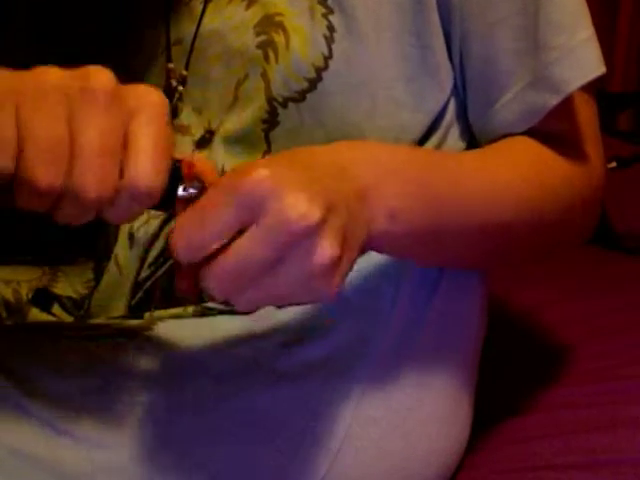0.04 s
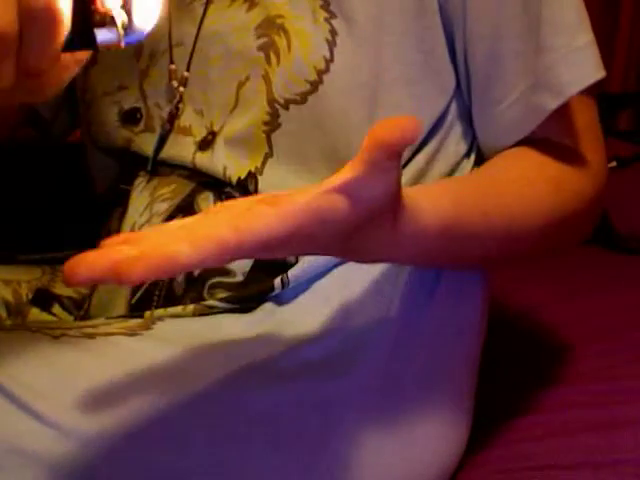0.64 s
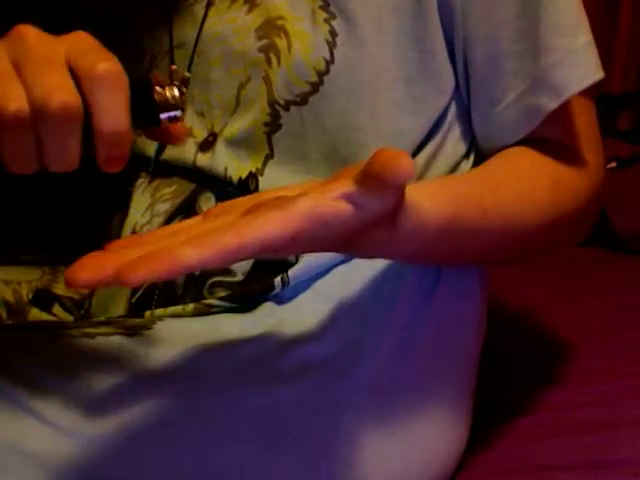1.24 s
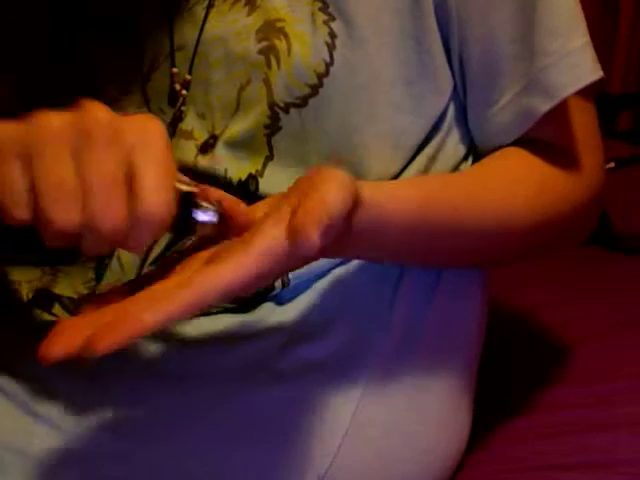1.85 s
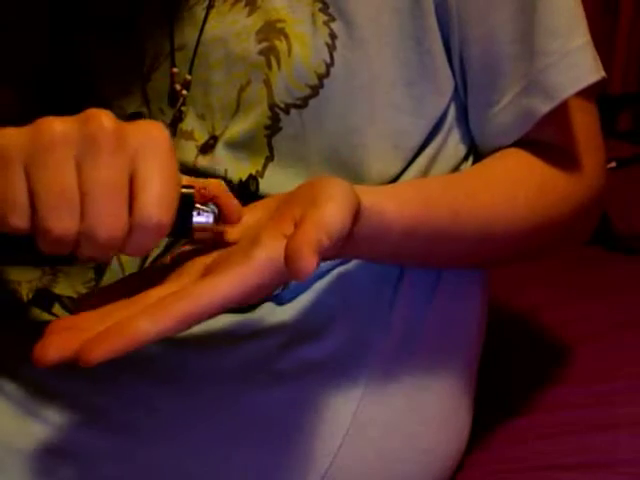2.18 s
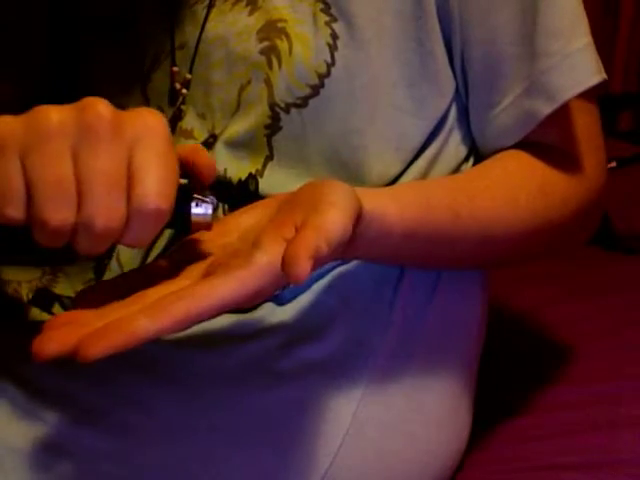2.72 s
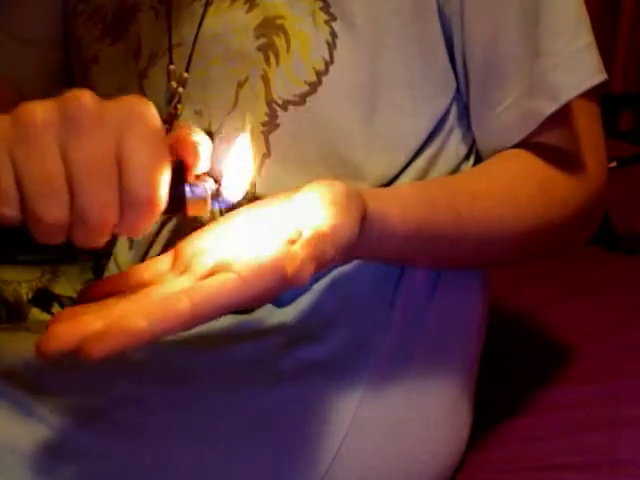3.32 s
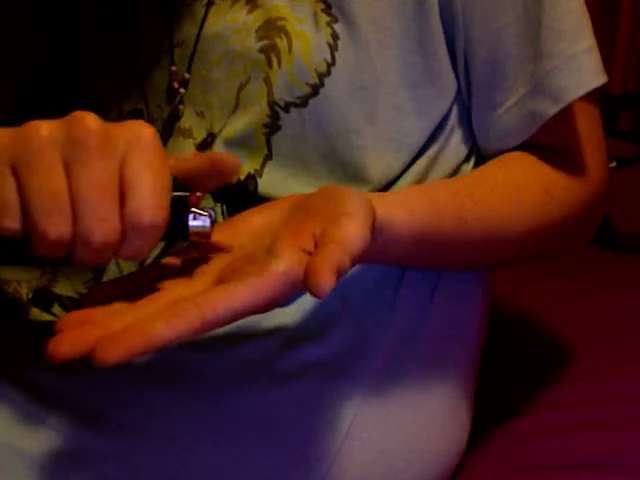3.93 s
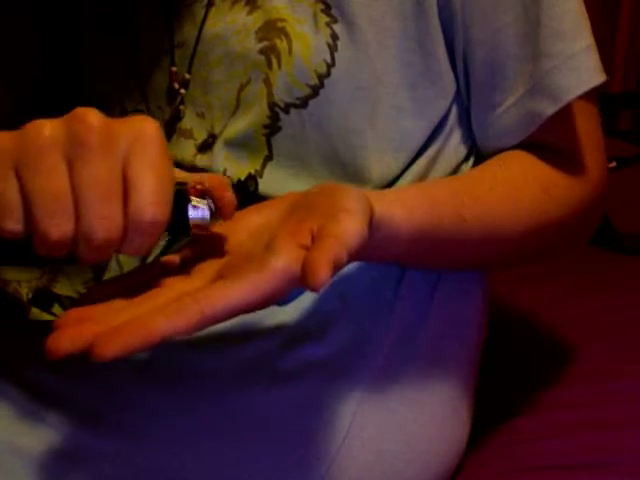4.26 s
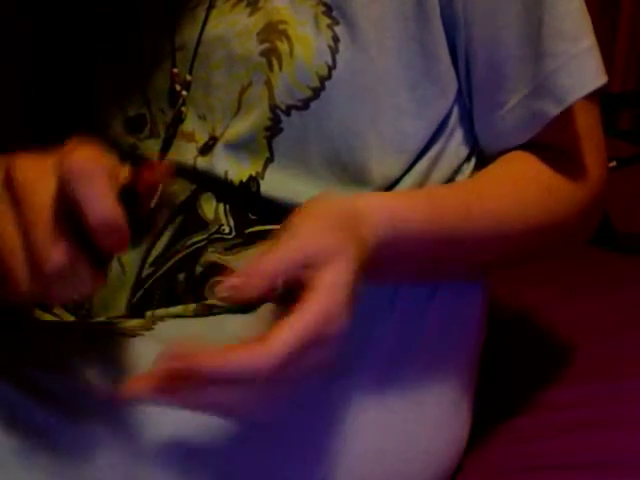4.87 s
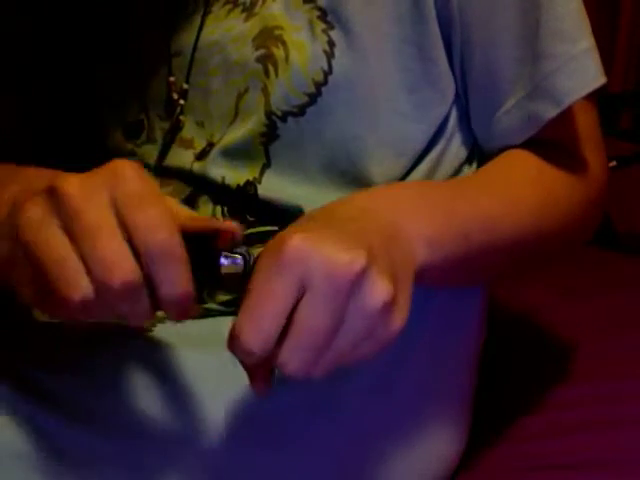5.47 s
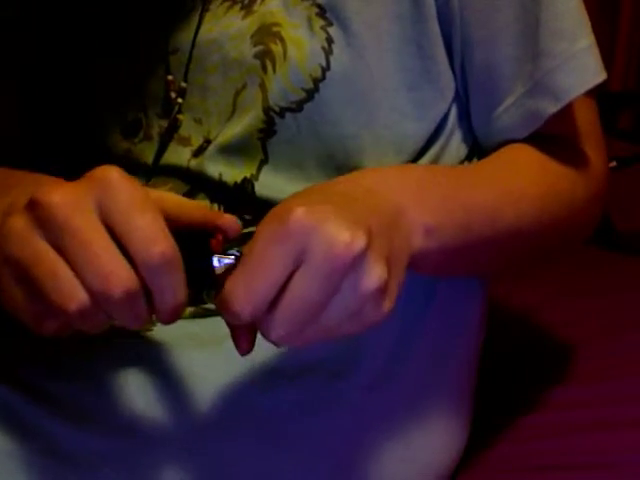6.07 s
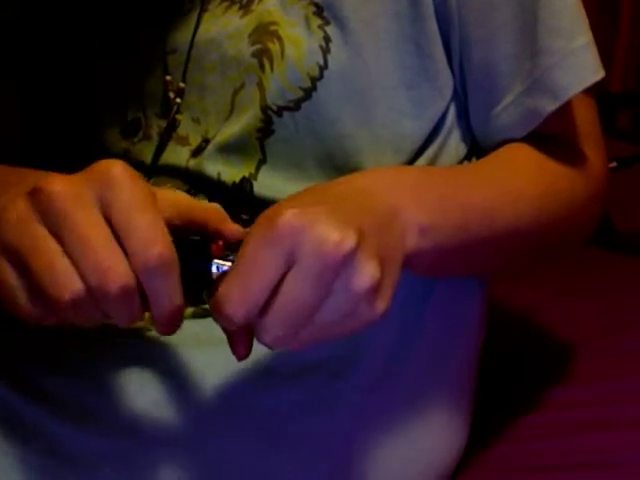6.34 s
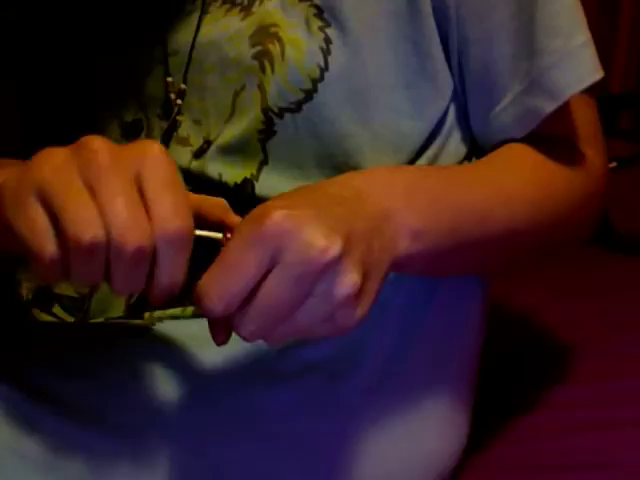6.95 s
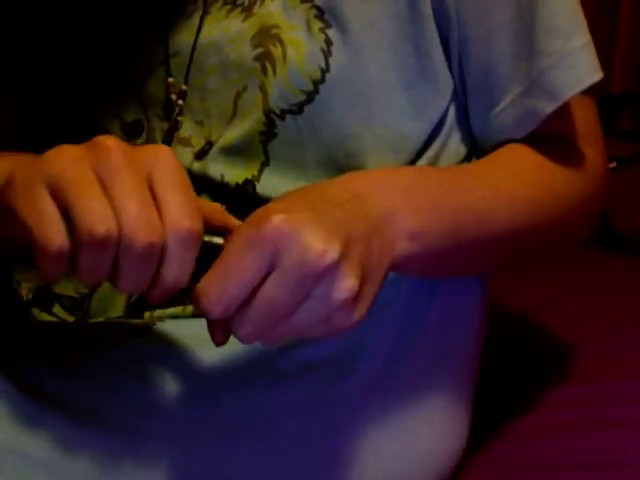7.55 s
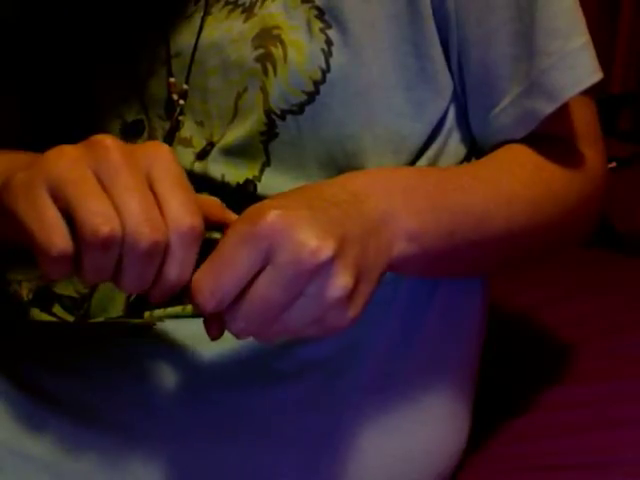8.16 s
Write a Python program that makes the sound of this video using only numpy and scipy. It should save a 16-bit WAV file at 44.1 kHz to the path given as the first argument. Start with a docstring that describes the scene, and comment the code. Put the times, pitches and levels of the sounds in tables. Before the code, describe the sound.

A flint lighter is handled close to the microphone in a quiet, furnished room. At about 0.1 seconds the wheel rasps and clicks with a tiny metallic ring, and the gas catches with a soft thump. A faint hiss and flame flutter follow, ending with small clicks near 0.8 seconds. At 2.5 seconds a light click releases a brief gas hiss, which stops with more clicks at 2.8. A louder strike comes at 3.1 seconds, with another soft thump and hiss, and the lever snaps shut sharply at 3.5. After a lull, a click at 6.8 seconds starts a steady, hollow, slightly whistling hiss of unlit gas flowing into a closed fist, lasting to the end at about 8 seconds. Throughout, a low computer fan drone and mains hum sit beneath a faint, high, rapidly pulsing electronic whine.

```python
"""A flint lighter is struck twice over a palm, then held unlit in a closed fist that fills with gas.
Friction makes the wheel rasp, impacts of thumb and lever click and set the steel ringing, and the gas
catches with a soft thump. The turbulent jet hisses, at the end through the resonances of the fist.
Underneath, a computer fan beats against mains hum and a camera's electronics whine at their frame rate."""
import sys
import numpy as np
from scipy import signal
from scipy.fft import rfft, irfft, next_fast_len
from scipy.io import wavfile
from scipy.ndimage import uniform_filter1d

SR = 44100
rng = np.random.default_rng(int(sys.argv[2]) if len(sys.argv) > 2 else 0)


def dump(signal):
    """Clip the signal to [-1, 1] and save it as 16-bit WAV at the path in sys.argv[1]."""
    limited = np.clip(np.atleast_2d(signal).T, -1, 1)
    pcm = np.round(limited * 32767).astype(np.int16)
    wavfile.write(sys.argv[1], SR, pcm)


N = 361619
T = np.arange(N) / SR
FILL_START_S = 6.765  # gas begins to flow into the fist

# spectrum of the gas jet: frequency_hz, gain_db
JET_SPECTRUM = [(900, -22), (1700, 6), (2250, 15), (2900, 0), (4200, -1.5), (6000, 4), (9500, -3.5),
                (12500, -5), (14000, 0.5), (16000, -33)]
# cavity modes of the fist: centre_hz, nominal_width_hz, relative_level_db
FIST_MODES = [(2226, 216, 3), (3810, 300, -9), (6150, 640, -12.5), (7850, 460, -12), (11900, 1600, -20)]


def amp(db):
    """Decibels as an amplitude ratio."""
    return 10 ** (np.asarray(db) / 20)


def unit(x):
    """A signal scaled to rms 1."""
    return x / np.sqrt(np.mean(x ** 2) + 1e-20)


def gain_at(spectrum, hz):
    """A spectrum's gain, interpolated on a log-frequency axis."""
    f, db = np.transpose(spectrum)
    return amp(np.interp(np.log(hz + 1), np.log(f), db))


def bell(hz, centre_hz, width_hz):
    """Lorentzian resonance curve: the gain halves at width_hz from the centre."""
    return 1 / (1 + ((hz - centre_hz) / width_hz) ** 2)


def noise(gain, size=N):
    """Noise of rms 1, coloured by a function of frequency."""
    padded = next_fast_len(size, True) * 2
    spectrum = rfft(rng.standard_normal(padded)) * gain(np.fft.rfftfreq(padded, 1 / SR))
    return unit(irfft(spectrum)[:size])


def add(mix, start_s, sound):
    """Superpose a sound on the mix."""
    part = mix[max(round(start_s * SR), 0):][:len(sound)]
    part += sound[:len(part)]


def burst(envelope, gain):
    """Coloured noise that carries the energy of its envelope."""
    return unit(envelope * noise(gain, size=len(envelope))) * np.sqrt(np.mean(envelope ** 2))


def fan_and_mains(air_db=-42):
    """Beating: fan tone and mains hum, 10 Hz apart, interfere over steady air noise."""
    # fan and mains tones: pitch_hz
    pitches = [89.97, 100.09, 166.7, 233.4, 385.5, 499.9, 898.7, 1100]
    # the same tones: rms_level_db
    levels = [-33, -43.5, -54, -57.5, -61, -66.5, -63.5, -65]
    # room air and microphone hiss: frequency_hz, gain_db
    air_spectrum = [(20, -36), (30, -18), (45, -5), (90, 0), (180, -1.5), (350, -7), (700, -11),
                    (1500, -16.5), (3000, -18.5), (6000, -23), (11000, -24), (13500, -25.5), (16000, -18.5)]
    tones = sum(amp(db) * np.sqrt(2) * np.cos(2 * np.pi * hz * T) for hz, db in zip(pitches, levels))
    return tones + amp(air_db) * noise(lambda f: gain_at(air_spectrum, f))


def electronics(frame_hz=14.982, first_frame_s=.0056, duty=.49, idle_hz=12000, tick_decay_s=.0066):
    """Periodic gating: each frame readout brings a tick, whine and fizz; a thin tone fills the pauses."""
    # readout whine: pitch_hz, rms_level_db
    low_whine, high_whine = [(8000, -47.5), (15248, -47.5)]
    # weaker readout tones: pitch_hz, rms_level_db
    fizz_tones = [(4950, -65), (9470, -63.5), (9900, -64), (10630, -60.5), (11052, -56.5), (11488, -59),
                  (11806, -58.5), (12200, -64), (12947, -58)]
    progress = (T - first_frame_s) * frame_hz % 1 / duty  # passes 1 as the readout ends
    gate = uniform_filter1d(1. * (progress < 1), size=50)
    tone = lambda hz, db: amp(db) * np.sqrt(2) * np.sin(2 * np.pi * hz * T)
    late_fade = 1 - .91 * np.minimum(progress, 1) ** 4
    whine = tone(*low_whine) + tone(*high_whine) * late_fade
    fizz = amp(-57) * noise(lambda f: bell(f, 10500, 4200)) + sum(tone(*row) for row in fizz_tones)
    tick = amp(-50) * np.exp(-progress * duty / frame_hz / tick_decay_s) * rng.standard_normal(N)
    return gate * (whine + fizz) + tick + (1 - gate) * tone(idle_hz, db=-60)


def faint_tone(pitch_hz=2135, width_hz=65, level_db=-54.5, flutter_db=2):
    """Random amplitude modulation makes a narrow noise band a fuzzy, fluttering tone."""
    flutter = flutter_db * noise(lambda f: bell(f, 0, 35))
    return amp(level_db + flutter) * noise(lambda f: bell(f, pitch_hz, width_hz))


def microphone_hiss(level_db=-57):
    """Self-noise in narrow, steady treble bands."""
    # hiss bands: centre_hz, width_hz, gain_db
    bands = [(8980, 200, 3.5), (12200, 260, 4), (12900, 310, -4)]
    return amp(level_db) * noise(lambda f: sum(amp(db) * bell(f, hz, width) for hz, width, db in bands))


def wheel(teeth_hz=900, bite=.3, spark_db=-22, snap_db=6, snap_s=.0035, slip_s=.0052, coast_s=.06):
    """Stick-slip friction: the toothed wheel creeps on the flint, breaks free, surges and is braked."""
    # spins: start_s, breakaway_s, fastest_s, surge_level_db, starting_creep_db
    spins = [(0.075, .126, .1485, -12, -44), (3.063, 3.107, 3.1233, -11.5, -33.5)]
    # rasp of the flint: frequency_hz, gain_db
    flint_spectrum = [(40, -17), (150, -6), (500, -12), (1000, -11), (1800, -4.5), (4500, -1.5), (9000, -5),
                      (13000, 0.5), (16000, -16)]
    # wheel and hood resonances the thumb leaves free, a list per spin: centre_hz, height_db
    grips = [
        [(2420, -10), (5850, -1), (7100, -2), (10450, -2), (12000, -6)],
        [(4150, 4), (6750, 0), (12800, -6), (13500, 1)],
    ]
    creep_db_per_s, surge_db_per_s, brake_db_per_s = 176, 454, 1050
    out = np.zeros(N)
    for (start_s, free_s, fastest_s, surge_db, creep_db), grip in zip(spins, grips):
        t = np.arange(start_s, fastest_s + coast_s, 1 / SR)
        driven_s = np.minimum(t, fastest_s)
        creep = amp(creep_db + creep_db_per_s * (driven_s - start_s))
        snap = snap_db * np.exp(-((t - fastest_s) / snap_s) ** 2)  # sparks tear off at full speed
        surge = amp(surge_db - surge_db_per_s * (fastest_s - driven_s) + snap)
        slipping = .5 + .5 * np.tanh((t - free_s) / slip_s)
        level = np.hypot(creep, slipping * surge) * amp(-brake_db_per_s * (t - driven_s))
        speed = np.exp(.3 * noise(lambda f: bell(f, 0, 200), size=len(t)))
        teeth = np.cumsum(teeth_hz * speed) / SR
        tooth_force = rng.uniform(.4, 1.6, 4096)[teeth.astype(int) % 4096]
        rasp = level * unit(1 - bite + 3 * bite * tooth_force * np.exp(-(teeth % 1) / .37))
        bright_share = level ** 2 / (level ** 2 + amp(spark_db) ** 2)  # grows as sparks fly
        resonances = lambda f: 1 + sum(amp(db) * bell(f, hz, 280) for hz, db in grip)
        colour = lambda f: gain_at(flint_spectrum, f) * resonances(f)
        add(out, start_s, burst(rasp * np.sqrt(bright_share), colour))
        add(out, start_s, burst(rasp * np.sqrt(1 - bright_share), lambda f: colour(f) * bell(f, 4100, 5500)))
    return out


def clicks(rise_s=.00058, cupped_db=8):
    """Damped impacts: plastic and steel knock together, and the grip stills the case in milliseconds."""
    # lever and wheel impacts: time_s, level_db, decay_s, resonance_hz, height_db, tilt_db_per_octave
    impacts = [(.149, -13, 0.0025, 1700, 10, -0.5), (.156, -11.5, 0.003, 2300, 28, 2),
               (.2095, -28, 0.0025, 2370, 18, -1), (.235, -20.5, 0.0012, 2100, 16, 0.5),
               (.537, -36, .003, 3600, 6, -13), (.8227, -25, 0.0028, 1500, -5, -2),
               (.858, -26.5, .00084, 11100, 14, 4.5), (2.463, -20.5, .003, 5500, 3, -2.5),
               (2.472, -32, .002, 3000, -3, 5), (2.568, -35.5, .002, 4200, 4, -3),
               (2.794, -28, .00089, 4600, 2, 3), (2.8063, -19, 0.0016, 7900, 13, 0.5),
               (2.813, -25, .0021, 2450, 5, -2), (3.0643, -22, .0012, 4500, 7, -2),
               (3.123, -7, 0.0039, 3940, 17, 6), (3.129, -3, 0.0021, 13200, 13, 16),
               (3.1415, -12, 0.0042, 6500, 2, -1), (3.5278, -19.5, 0.00095, 4400, 8, -6),
               (3.5447, -4, 0.0016, 5100, 15, 2.5), (4.569, -35.5, .0022, 5430, 15, -3),
               (6.761, -16, 0.0016, 4250, 6, 1.5), (6.763, -24, 0.0058, 2300, 12, -5),
               (6.7705, -21.5, 0.0019, 2300, 21, -3), (6.861, -34, .0015, 6200, 5, -1)]
    # response of the case: frequency_hz, gain_db
    case_spectrum = [(150, -26), (800, -16), (1400, -5), (2100, 0.5), (4000, 1), (7000, -1.5), (9500, -3.5),
                     (12500, -1), (16000, -8.5)]
    out, t = np.zeros(N), np.arange(-.003, .04, 1 / SR)
    f = np.fft.rfftfreq(len(t), 1 / SR)
    for time_s, level_db, decay_s, hz, height_db, tilt_db in impacts:
        envelope = np.exp(-(np.minimum(t, 0) / rise_s) ** 2 - np.maximum(t, 0) / decay_s)
        tilt = amp(tilt_db * np.log2((f + 500) / 4000))
        colour = gain_at(case_spectrum, f) * tilt * (1 + amp(height_db) * bell(f, hz, 300))
        if time_s > FILL_START_S - .5:  # the closed fist colours the click
            colour *= 1 + amp(cupped_db) * sum(bell(f, mode, width / 2) for mode, width, _ in FIST_MODES)
        knock = irfft(rfft(envelope * rng.standard_normal(len(t))) * colour, len(t))
        add(out, time_s + t[0], amp(level_db) * unit(knock) * np.sqrt(np.mean(envelope ** 2)))
    return out


def steel_ring():
    """Free vibration of spring and hood; where a blow lands decides which mode leads."""
    # blows: time_s, level_db, tension_pitch_factor, lead_pitch_hz, lead_level_db, lead_t60_s
    blows = [(.15, -38.5, 1.13, 1300, -36, 0.29), (3.125, -36, 0.99, 4270, -28, 0.21),
             (3.5445, -30, 1, 2800, -32, 0.17)]
    # spring and hood modes: base_pitch_hz, relative_level_db, t60_s
    modes = [(1170, -8, 0.25), (1406, -6.5, 0.39), (2480, -2, 0.098), (4167, -2, 0.17), (4960, -10, .13),
             (6578, -13, .18), (6800, -6, .18)]
    out, t = np.zeros(N), np.arange(SR // 2) / SR
    mode = lambda hz, db, t60: amp(db - 60 * t / t60) * np.sin(2 * np.pi * hz * t)
    for time_s, level_db, tension, *lead in blows:
        ring = sum(mode(hz * tension, level_db + db, t60) for hz, db, t60 in modes)
        add(out, time_s, mode(*lead) + ring)
    return out


def gas_jets(low_hz=7800, high_hz=13900):
    """Turbulent nozzle flow hisses with two fuzzy whistles; the upper is stronger when the gas burns."""
    # releases into open air: start_s, end_s, level_db, low_whistle_height_db, high_whistle_height_db
    releases = [(0.159, 0.83, -47.5, 0, 10), (2.465, 2.804, -45, 9, -10), (3.124, 3.558, -46, 6, 3)]
    out = np.zeros(N)
    for start_s, end_s, level_db, low_db, high_db in releases:
        valve = signal.windows.tukey(round((end_s - start_s) * SR), .04)
        whistles = lambda f: 1 + amp(low_db) * bell(f, low_hz, 310) + amp(high_db) * bell(f, high_hz, 450)
        add(out, start_s, amp(level_db) * burst(valve, lambda f: gain_at(JET_SPECTRUM, f) * whistles(f)))
    return out


def ignitions(fall_per_s=11, overtone=.18, rush_db=-7.5):
    """Thermal expansion: the swelling flame pushes the air in a falling thump with a dull rush."""
    # the gas catches: time_s, level_db, half_length_s, glide_start_hz
    thumps = [(0.173, -20.5, 0.0058, 180.6), (3.1413, -14.5, 0.0084, 180.6)]
    out, t = np.zeros(N), np.arange(-.04, .06, 1 / SR)
    for time_s, level_db, half_length_s, hz in thumps:
        swell = amp(level_db) * np.exp(-(t / half_length_s) ** 2)
        angle = 2 * np.pi * (np.cumsum(hz * np.exp(-fall_per_s * t)) / SR + rng.random())
        rush = amp(rush_db) * burst(swell, lambda f: bell(f, 275, 130) * f / (f + 80))
        add(out, time_s + t[0], swell * (np.sin(angle) + overtone * np.sin(2 * angle)) + rush)
    return out


def puffs():
    """Flame flutter and the friction of skin on cloth give soft swells of low band noise."""
    # swells: time_s, level_db, half_length_s, centre_hz, width_hz
    swells = [(0.533, -45.5, .012, 1090, 300), (.647, -38.5, 0.012, 350, 120), (0.677, -49, 0.1, 400, 400),
              (0.774, -40.5, .021, 1050, 180), (0.834, -38.5, 0.0068, 350, 500),
              (0.854, -45.5, 0.038, 1090, 200), (4.067, -45, 0.012, 1100, 200),
              (8.156, -45, 0.011, 1050, 400)]
    out, t = np.zeros(N), np.arange(-.15, .15, 1 / SR)
    for time_s, level_db, half_length_s, hz, width_hz in swells:
        puff = burst(np.exp(-(t / half_length_s) ** 2), lambda f: bell(f, hz, width_hz) * f / (f + 80))
        add(out, time_s + t[0], amp(level_db) * puff)
    return out


def fist(level_db=-41, swell_db=6, swell_s=.084, leak_db=-8, flutter_db=.5):
    """Cavity resonance: the jet excites the fist's hollow, whose lowest mode sinks as the grip settles."""
    t = np.arange(N - round(FILL_START_S * SR)) / SR
    flow_db = level_db - swell_db * np.exp(-t / swell_s)
    sinking = 1.035 - .042 * t  # factor on the lowest mode's frequency
    cavity = 0
    for k, (hz, width_hz, mode_db) in enumerate(FIST_MODES):
        cycles = hz * (np.cumsum(sinking) / SR if k == 0 else t)
        real, imag = (noise(lambda f: bell(f, 0, width_hz * .75), size=len(t)) for _ in range(2))
        band = ((real + 1j * imag) * np.exp(2j * np.pi * cycles)).real  # noise shifted up to the mode
        cavity += amp(mode_db) * np.sqrt(width_hz) * band
    hiss = unit(cavity) + amp(leak_db) * noise(lambda f: gain_at(JET_SPECTRUM, f), size=len(t))
    flutter = flutter_db * noise(lambda f: bell(f, 0, 8.5), size=len(t))
    out = np.zeros(N)
    add(out, FILL_START_S, hiss * amp(flow_db + flutter))
    return out


def room(direct, near_db=-13, near_t60_s=.037, far_db=-15, far_t60_s=.096):
    """Reverberation: quick scatter from body and desk, and the short tail of a furnished room."""
    t = np.arange(SR // 4) / SR
    out = direct.copy()
    for db, t60 in ((near_db, near_t60_s), (far_db, far_t60_s)):
        tail = noise(lambda f: bell(f, 0, 14000), size=len(t)) * amp(-60 * t / t60) * (t > .006)
        out += amp(db) * signal.oaconvolve(direct, tail / np.linalg.norm(tail))[:N]
    return out


def scene():
    """Superposition: the lighter is central; a level difference sets the fan's drone slightly right."""
    # balance of the drone, left then right: gain_db
    drone_pan = [
        [-.5],
        [.5],
    ]
    lighter = room(wheel() + clicks() + puffs()) + ignitions() + steel_ring() + gas_jets() + fist()
    air = fan_and_mains()
    drone = irfft(rfft(air) * bell(np.fft.rfftfreq(N, 1 / SR), 0, 1100) ** 2, N)
    centre = lighter + electronics() + faint_tone() + microphone_hiss() + air - drone
    return centre + drone * amp(drone_pan)


def record(dry, cutoff_hz=15800):
    """Hard clipping flattens peaks above full scale; a low-pass filter then limits the band."""
    lowpass = signal.firwin(511, cutoff_hz, window=("kaiser", 9), fs=SR)
    return signal.oaconvolve(np.clip(dry, -1, 1), lowpass[None], "same")


dry = scene()
out = record(dry)
dump(out)
```